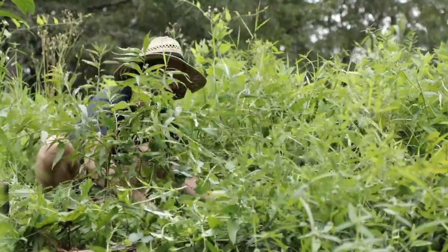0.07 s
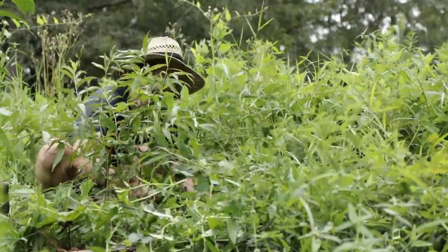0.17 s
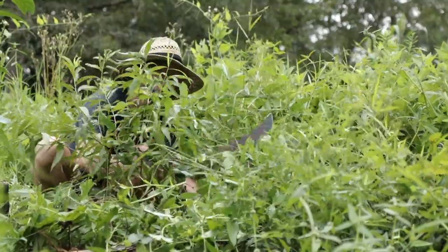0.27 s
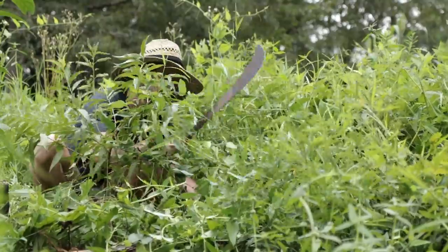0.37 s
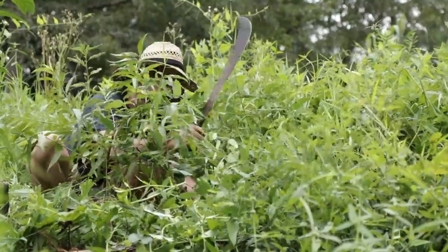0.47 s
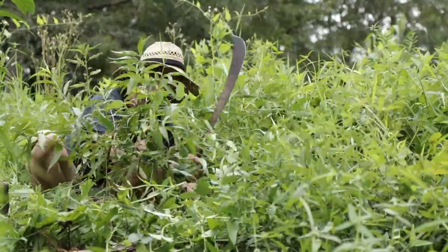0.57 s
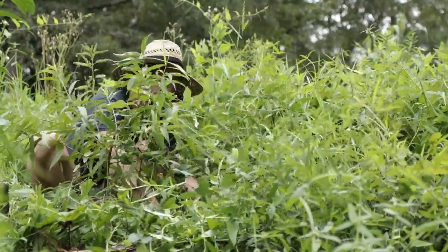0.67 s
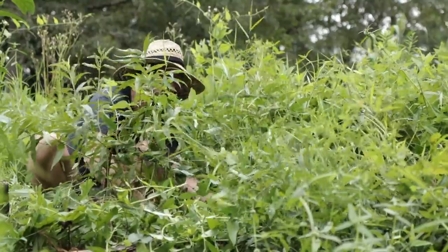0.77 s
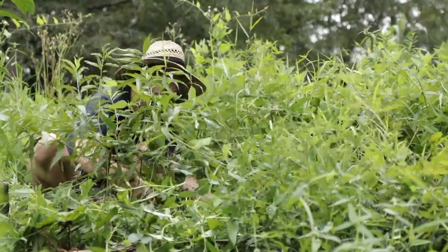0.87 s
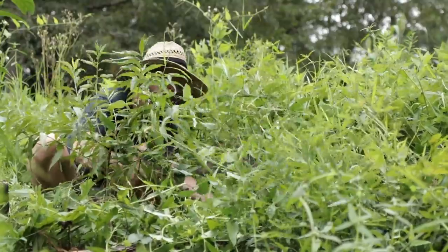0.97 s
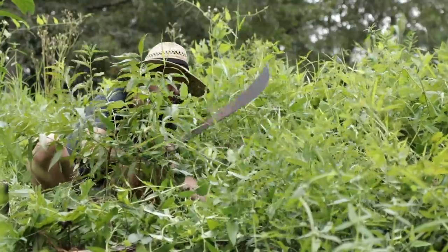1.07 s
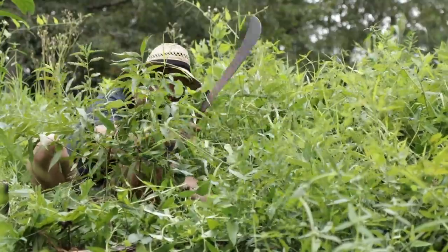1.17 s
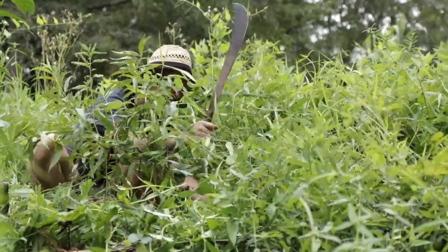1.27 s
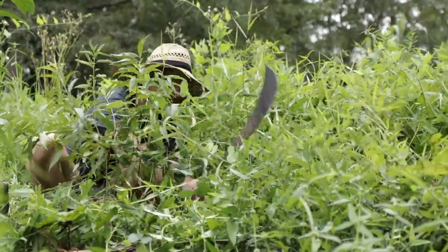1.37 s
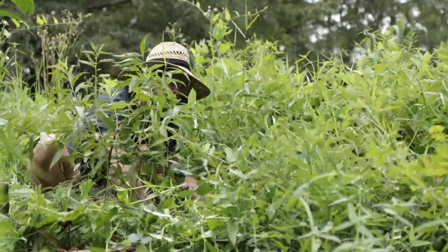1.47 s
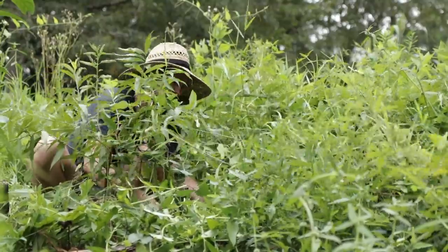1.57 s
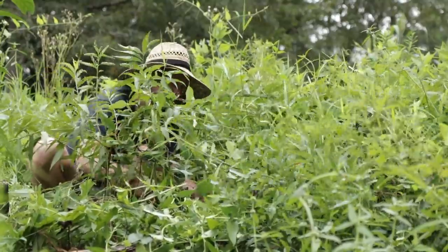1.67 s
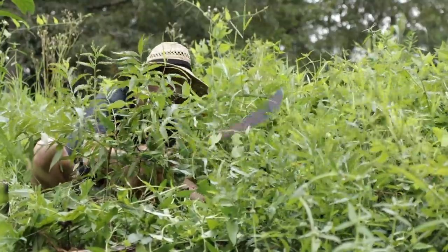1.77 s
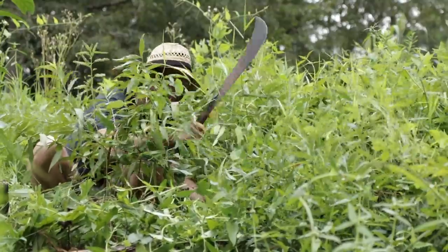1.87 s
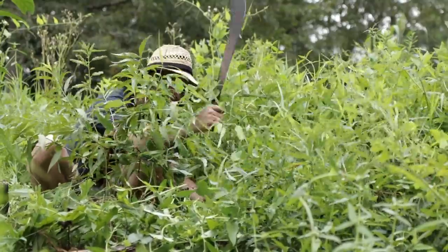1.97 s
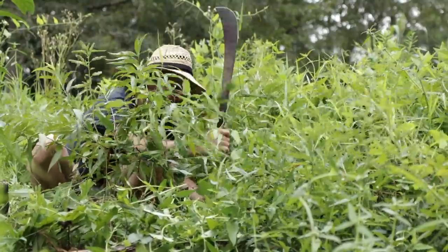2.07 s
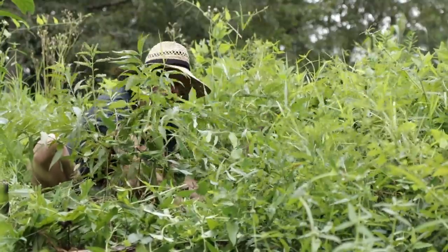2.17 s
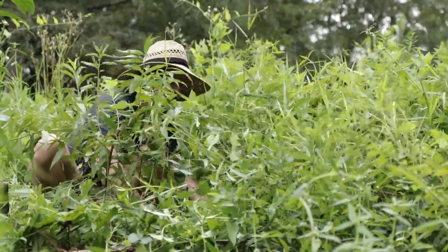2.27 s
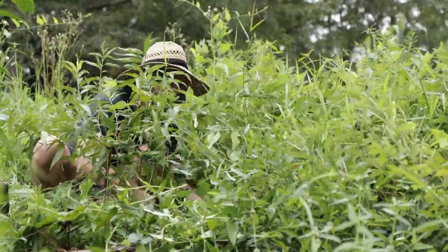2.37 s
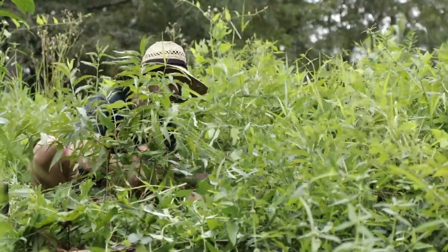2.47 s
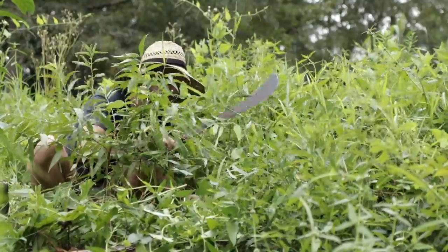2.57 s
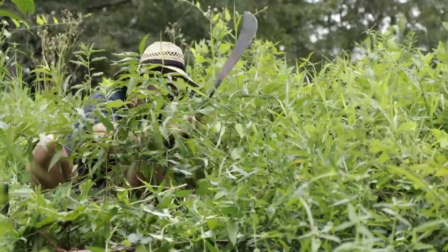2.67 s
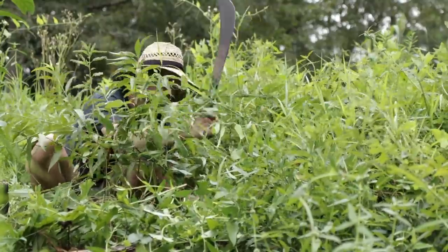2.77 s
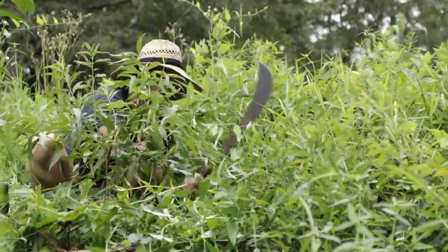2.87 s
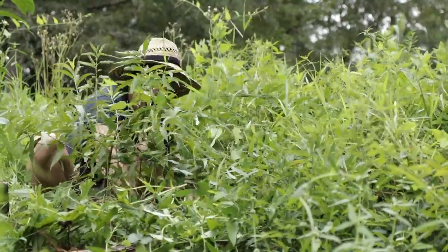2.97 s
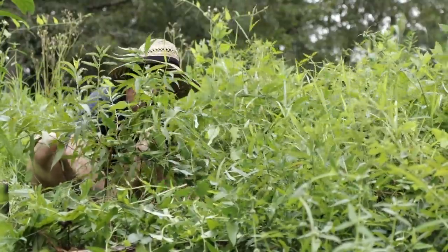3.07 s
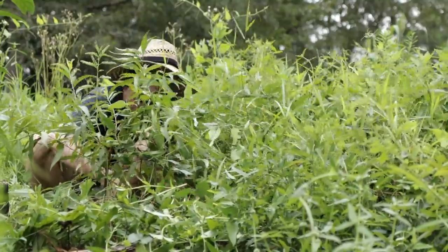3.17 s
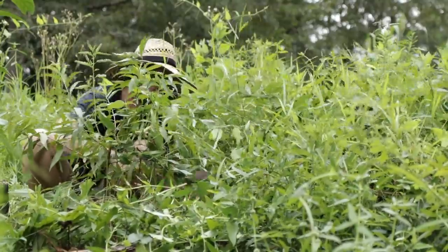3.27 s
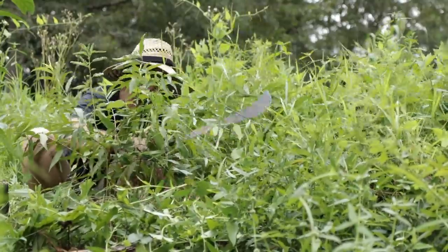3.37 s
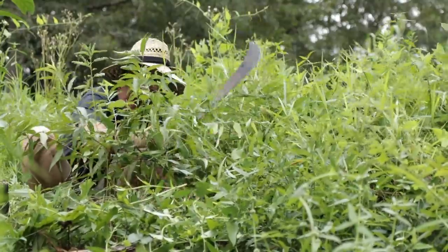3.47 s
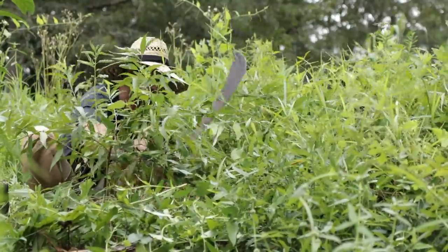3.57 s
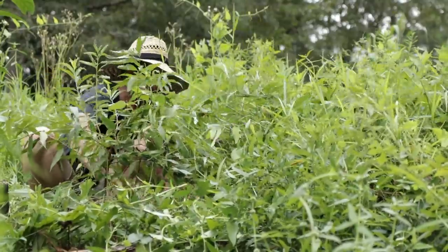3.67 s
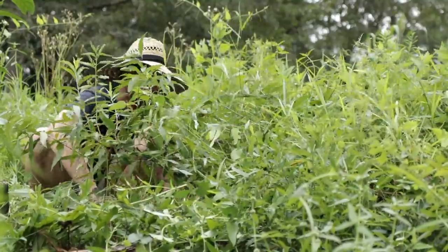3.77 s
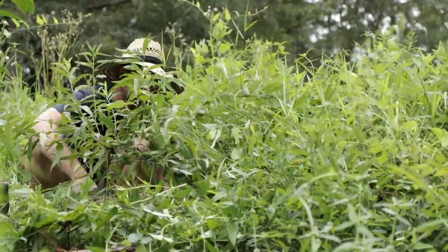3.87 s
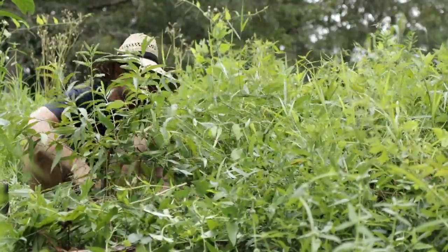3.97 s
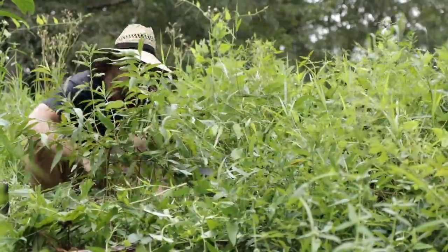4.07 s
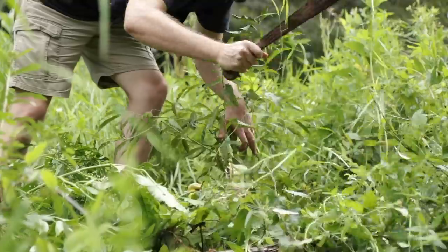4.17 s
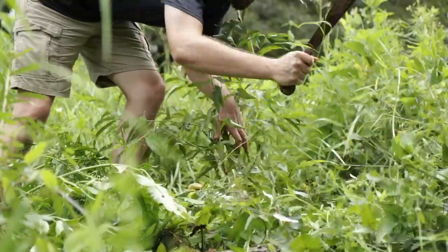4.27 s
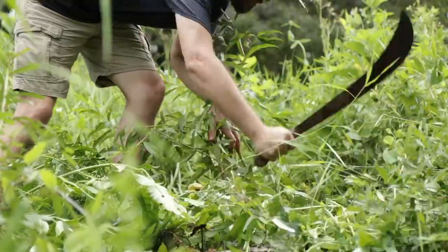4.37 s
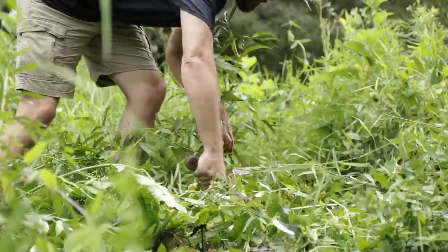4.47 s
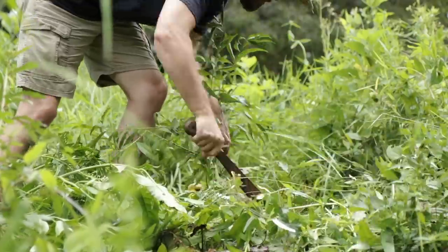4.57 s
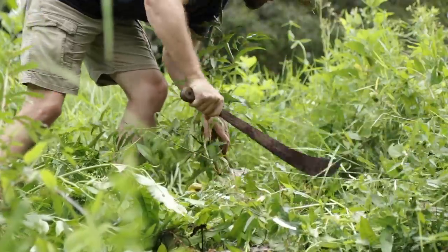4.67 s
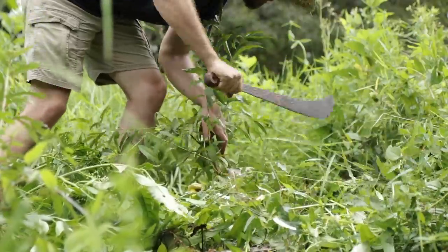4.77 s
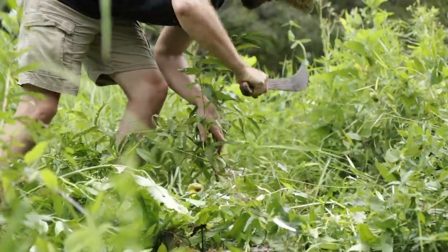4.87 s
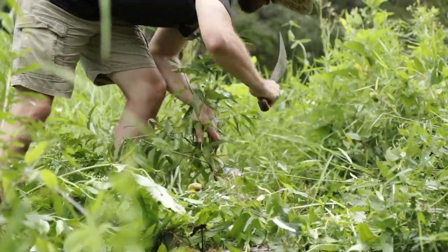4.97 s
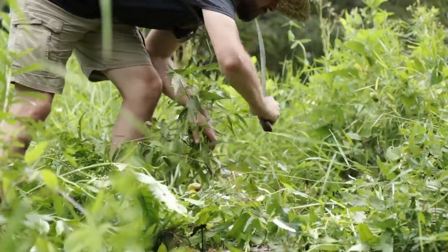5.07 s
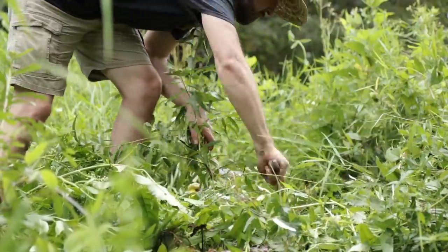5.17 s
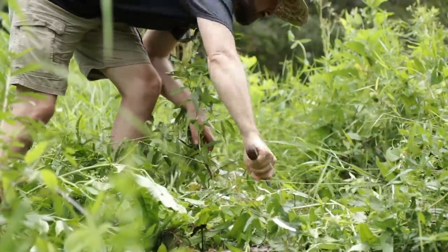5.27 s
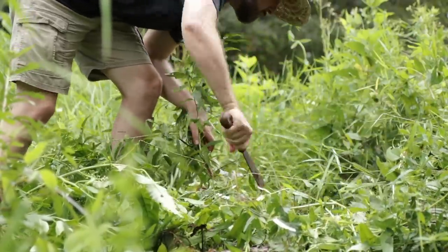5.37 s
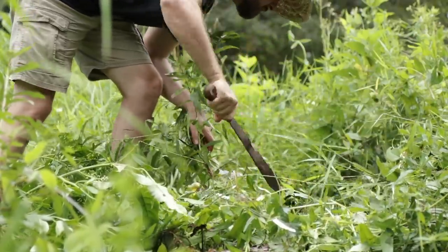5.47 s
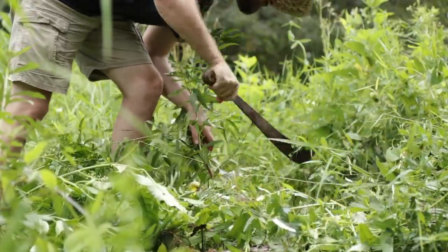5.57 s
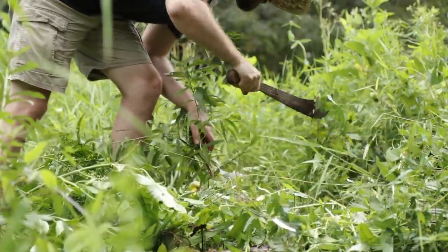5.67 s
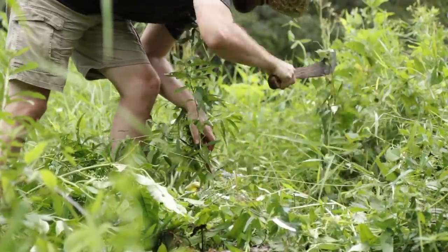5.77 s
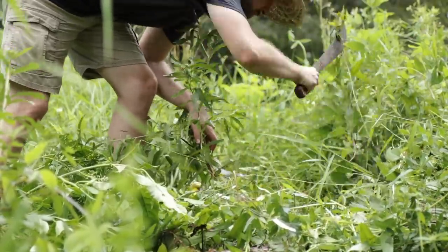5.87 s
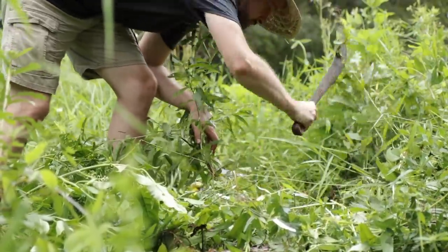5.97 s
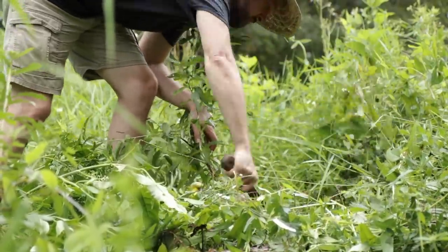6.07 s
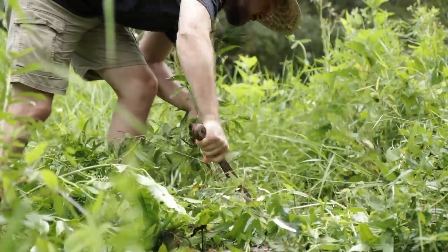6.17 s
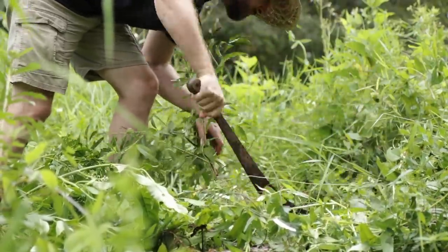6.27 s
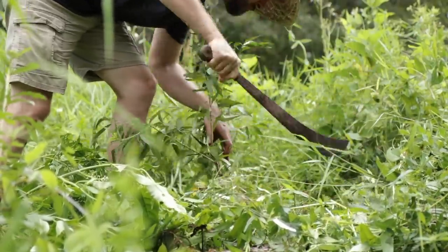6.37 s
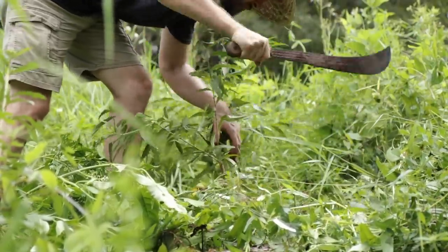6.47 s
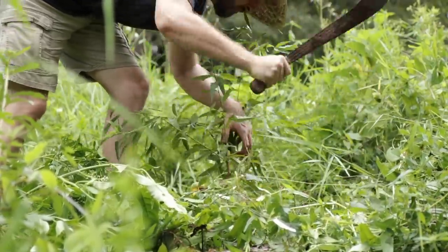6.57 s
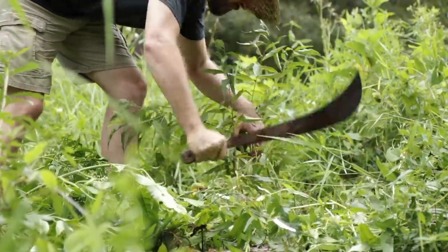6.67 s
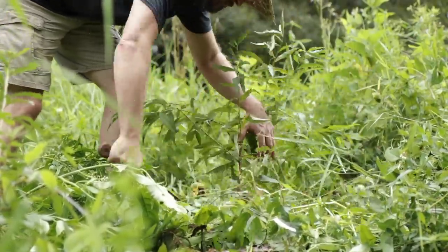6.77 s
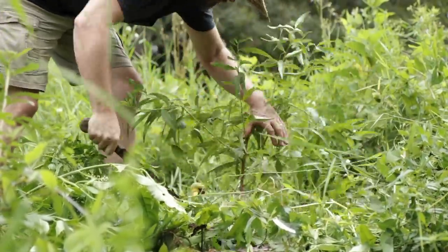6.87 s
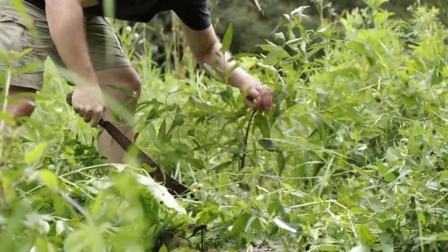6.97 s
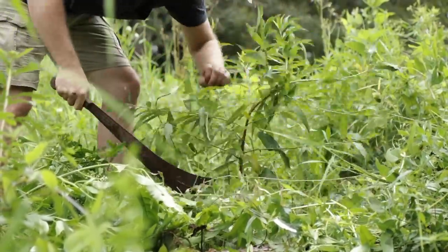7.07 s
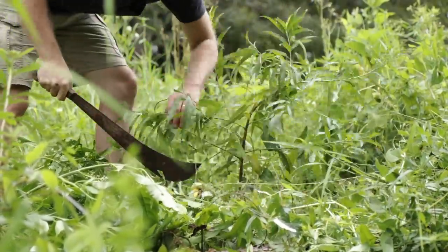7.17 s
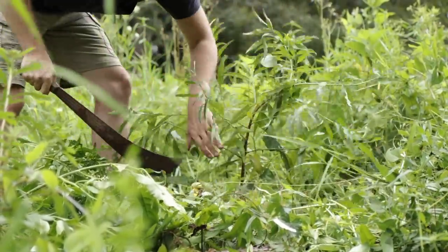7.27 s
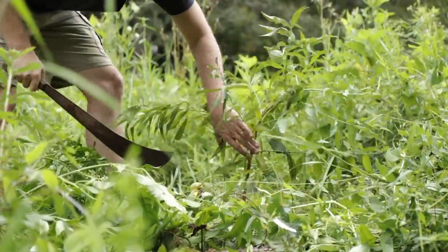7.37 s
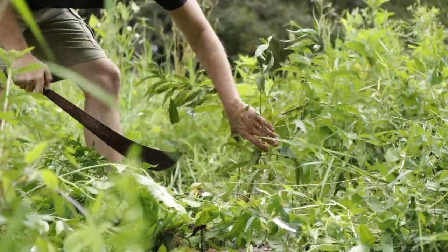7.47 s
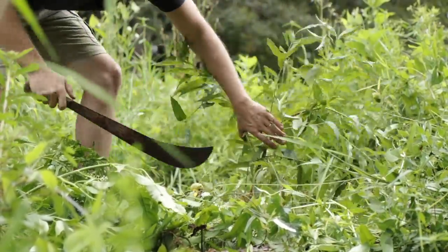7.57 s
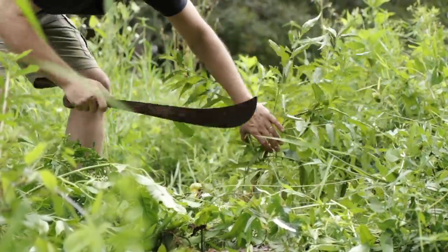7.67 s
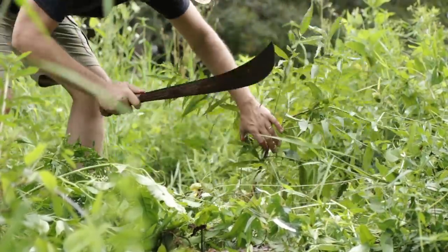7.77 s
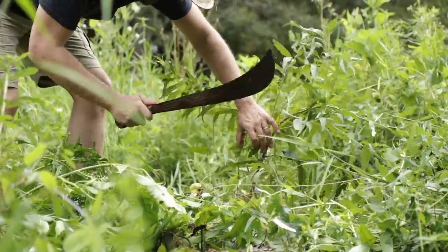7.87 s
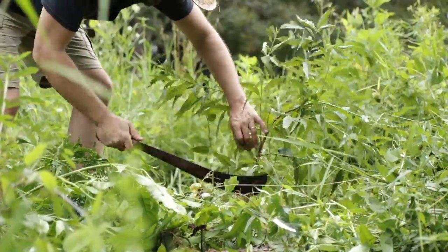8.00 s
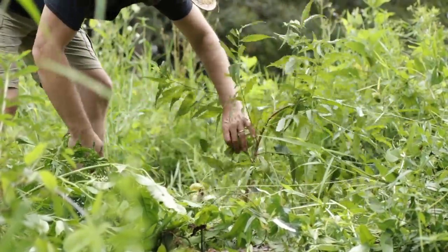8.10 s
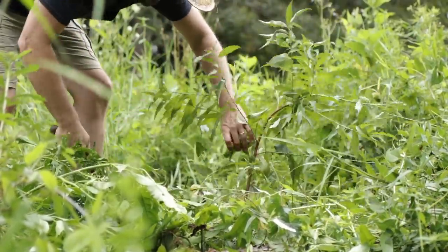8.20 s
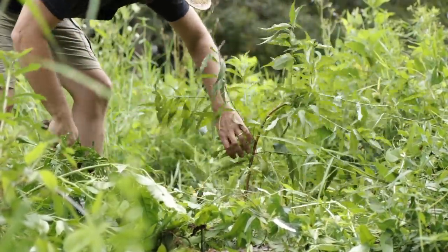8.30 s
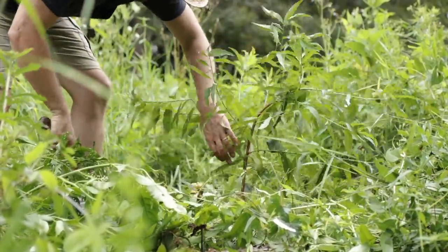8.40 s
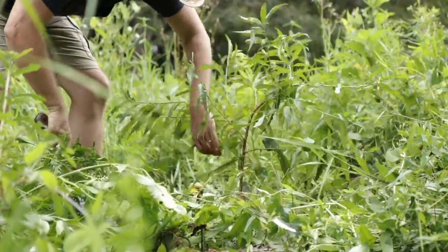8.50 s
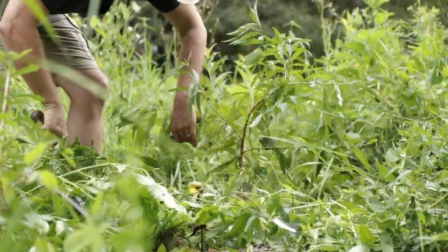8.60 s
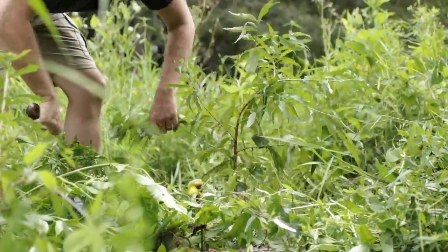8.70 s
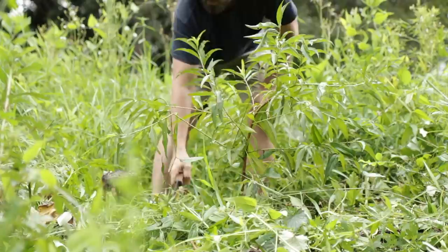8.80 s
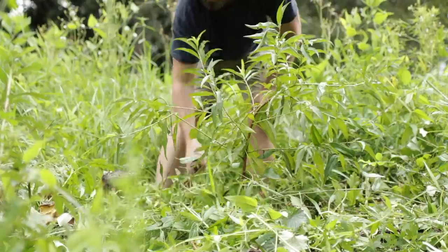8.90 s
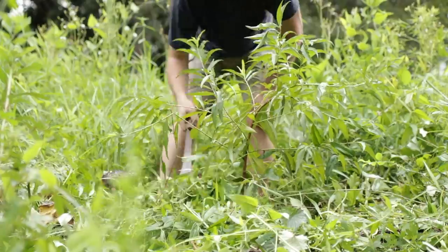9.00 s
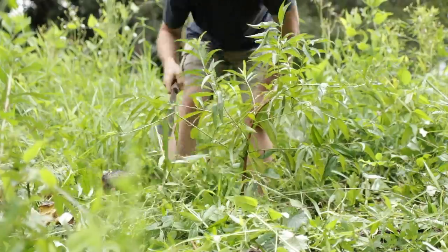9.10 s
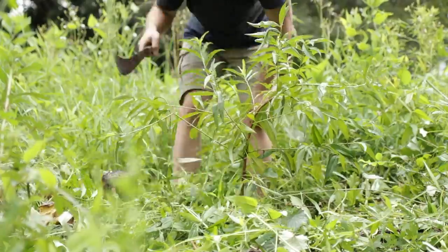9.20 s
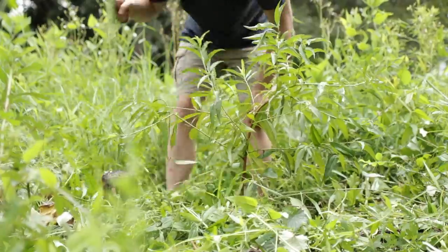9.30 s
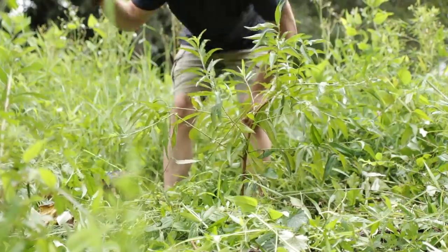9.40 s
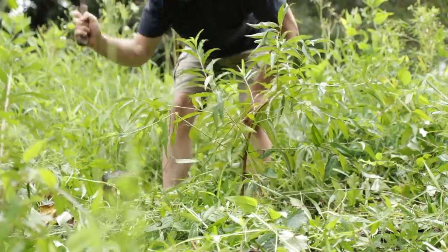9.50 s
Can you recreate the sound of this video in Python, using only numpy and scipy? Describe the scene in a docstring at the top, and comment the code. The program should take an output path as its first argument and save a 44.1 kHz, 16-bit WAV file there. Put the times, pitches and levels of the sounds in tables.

```python
"""Twelve machete strokes cut through tall weeds. Each tears a few stems by brittle fracture, excites the
blade's modes and ends as an impact in the soil. Now and then friction makes the steel sing as it is
drawn back across the stalks; twigs snap and leaves rustle between strokes. Crickets and katydids sing
by stridulation, over faint bird-like notes, open-air hush and the drone of a far machine."""
import sys
import numpy as np
from scipy import signal
from scipy.fft import rfft, irfft
from scipy.io import wavfile
from scipy.ndimage import uniform_filter1d

SR = 44100
rng = np.random.default_rng(int(sys.argv[2]) if len(sys.argv) > 2 else 0)


def inscribe(sig):
    """Save sig as 16-bit PCM at rate SR to the path in sys.argv[1].

    A 1-D sig is mono; a 2-D sig holds one channel per row.
    Samples are clipped to [-1, 1] before scaling.
    """
    pcm = np.round(np.clip(np.atleast_2d(sig).T, -1, 1) * 32767)
    wavfile.write(sys.argv[1], SR, pcm.astype(np.int16))


N = 420713
TIME = np.arange(N) / SR


# The edge passes in to the thickest stem of a bunch, then out; first_stems_db is relative to that stem.
# start_s, way_in_s, way_out_s, level_db, first_stems_db, tilt_db_per_octave, stem_hz, falling_leaves_db
MACHETE_STROKES = [(0.002, 0.013, 0.01, -14.5, -2.5, 0.8, 1480, -36),
                   (0.715, 0.024, 0.023, -12.5, -11, 0.2, 2170, -41),
                   (1.4993, 0.0026, 0.014, -10, -8, -0.5, 1920, -37.5),
                   (2.249, 0.013, 0.021, -11, -14, 0, 2350, -36.5),
                   (2.996, 0.0049, 0.023, -12.5, -9, 0.3, 2200, -36.5),
                   (3.735, 0.027, 0.0055, -17, -5, -0.3, 2250, -42),
                   (4.511, 0.0087, 0.0089, -14, -2, -0.8, 2200, -50),
                   (5.259, 0.023, 0.024, -15.5, -5, 1.6, 2300, -37.5),
                   (6.145, 0.011, 0.0027, -11.5, -26, 1, 6500, -41.5),
                   (6.7944, 0.015, 0.0079, -12, -2.5, 0.5, 2230, -40.5),
                   (8.142, 0.028, 0.012, -20, -11, -0.5, 1730, -37),
                   (8.892, 0.0072, 0.004, -8.5, -6.5, 0, 1500, -38.5)]
def cuts():
    """Fracture under load: force peaks at the thickest stem, which splits; the cut ends crunch."""
    out, t = np.zeros(N), np.arange(SR // 5) / SR
    exit_db = -6
    for start, way_in, way_out, db, first_db, tilt_db, stem_hz, _ in MACHETE_STROKES:
        length = way_in + way_out
        load = amp(np.interp(t, [0, way_in, length], [first_db, 0, exit_db]))
        edge = load * contact(t, length, rise=0.000067, fall=0.0076)
        split = amp(-3.5) * contact(np.maximum(t - way_in, 0), 0, rise=0.0001, fall=0.002)
        crunch = amp(-24.5) * contact(t, length, rise=0.015, fall=0.017)
        add(out, start, amp(db - 1.1) * tear(t, edge + split + crunch, tilt_db, stem_hz))
    return out


# Spectrum of tearing stems: frequency_hz, density_db
STEM_SPECTRUM = [(100, -10), (330, 1.5), (650, -2), (1100, -6.5), (1500, 0), (2100, 1), (2900, -1.5),
                 (5500, -2.5), (9000, -9.5), (15500, -15)]
def tear(t, force, tilt_db, stem_hz):
    """Impulse excitation: breaking fibres ring the stalk and the blade, which the stems damp."""
    clicks = fibres(len(t), per_s=10000, spread_db=2.9) * force
    fracture = colour(clicks, STEM_SPECTRUM, tilt_db)
    stalk = resonance(fracture, stem_hz, q=5)
    clank = steel(clicks, favoured_hz=stem_hz, damping_db_per_s=1500)
    sound = fracture + amp(-6) * stalk + amp(-11) * clank
    return amp(-1) * sound * np.linalg.norm(force) / np.linalg.norm(sound)


# The blade lands in the soil: start_s, level_db, knock_hz, decay_s, thump_db
SOIL_IMPACTS = [(0.0198, -3.5, 786, 0.007, -17.5), (.756, -8.5, 360, 0.0097, -20),
                (1.514, -12.5, 276, 0.013, -23), (2.2741, -5.5, 441, 0.0068, -23.5),
                (3.016, 0.5, 591, 0.0061, -30), (3.7603, -3.5, 566, 0.0056, -24.5),
                (4.523, -8.5, 394, 0.0084, -28), (5.282, -17, 620, 0.02, -30),
                (6.153, -15, 519, 0.012, -29), (6.808, -10.5, 774, 0.0076, -25.5),
                (8.167, -48, 400, 0.0091, -52), (8.8984, -11, 648, 0.007, -23)]
def blows():
    """Inelastic impact: a crack, a knock that falls in pitch as the blade slows, a thump of the ground."""
    out, t = np.zeros(N), np.arange(SR // 2) / SR
    for start, db, hz, decay, thump_db in SOIL_IMPACTS:
        knock_hz = hz * (0.359 + 0.72 * np.exp(-t / 0.01093) + 1.08 * np.exp(-t / 0.0013))
        knock = tone(knock_hz) * contact(t, 0, rise=0.00075, fall=decay)
        crack = noise(len(t), [(60, -20), (hz, -2), (hz * 3.1, 0), (hz * 8, -20)])
        crack *= contact(t, 0, rise=0.0001, fall=0.0015)
        crumbs = noise(len(t), [(60, -16), (hz * 0.5, -2), (hz, 0), (hz * 5, -26)])
        crumbs *= contact(t, 0, rise=0.00053, fall=decay)
        add(out, start, amp(db) * (amp(-3) * knock + amp(-3.5) * crack + amp(-4.5) * crumbs))
        thump = tone(66 + rng.uniform(95, 167) * np.exp(-t / 0.019))
        soil = noise(len(t), [(35, -56), (55, 13), (85, 8), (170, -4), (400, -21), (2000, -67)])
        ground = (thump + 0.45 * soil) * contact(t, 0, rise=0.002, fall=0.017)
        tail = amp(-17) * soil * contact(t, 0, rise=0.0074, fall=0.099)
        add(out, start, amp(thump_db + 3) * (ground + tail))
    return out


# The edge clips grit in the soil: start_s, length_s, level_db, ring_hz
GRIT_CONTACTS = [(1.527, 0.0063, -10.5, 9100), (4.525, 0.0043, -9, 7040), (6.141, 0.004, -17.5, 9000),
                 (6.156, 0.0047, -5.5, 6400)]
def grit():
    """Hard contact: the edge meets a grain of stone in a short, very bright scratch."""
    out, t = np.zeros(N), np.arange(SR // 10) / SR
    for start, length, db, ring_hz in GRIT_CONTACTS:
        force = contact(t, length, rise=0.00028, fall=0.0022)
        add(out, start, amp(db) * tear(t, force, tilt_db=9.5, stem_hz=ring_hz))
    return out


# Modes of the steel blade: frequency_hz, level_db, t60_s
BLADE_MODES = [(2222, 0, .14), (3058, -5, .55), (3888, -4, .2), (4681, -4, .18), (5455, -1, .3),
               (6709, -2, .22), (8020, -7, .14), (9450, -11, .12), (11500, -14, .1)]
def steel(force, favoured_hz, damping_db_per_s=0):
    """Modal vibration: the point of contact favours some modes, and added damping shortens the ring."""
    t = np.arange(SR // 2) / SR
    ring = np.zeros(len(t))
    for hz, db, t60 in BLADE_MODES:
        coupling_db = -10 * abs(np.log2(hz / favoured_hz))
        ring += amp(db + coupling_db - 60 * t / t60) * np.sin(2 * np.pi * hz * t)
    return convolve(force, ring * amp(-damping_db_per_s * t))


# The flat of the blade slides over stalks: start_s, length_s, level_db, favoured_hz
BLADE_SLIDES = [(.29, .05, -56, 5000), (1.028, .03, -40, 6200), (1.797, .006, -48, 3500),
                (3.018, .004, -32, 5500), (4.09, .07, -54, 3800), (4.61, .03, -41, 3500),
                (5.53, .04, -48, 3100), (6.06, .07, -52, 4600), (6.17, .1, -50, 3100),
                (6.9, .04, -46, 2200), (7.02, .03, -34, 3100), (7.03, .04, -39, 6500),
                (7.03, .1, -37, 2200)]
def slides():
    """Frictional excitation: a stalk catches the free blade, then rubs along it and keeps it singing."""
    out, t = np.zeros(N), np.arange(SR * 3 // 5) / SR
    for start, length, db, favoured_hz in BLADE_SLIDES:
        pressure = amp(db) * contact(t, length, rise=0.0028, fall=0.0018)
        rub = pressure * fibres(len(t), per_s=13000, spread_db=-2)
        catch = 0.7 * np.linalg.norm(rub) * (t == 0)
        add(out, start, steel(rub + catch, favoured_hz) + amp(-13) * colour(rub, LEAF_SPECTRUM))
    return out


# Spectrum of a breaking twig: frequency_hz, density_db
TWIG_SPECTRUM = [(150, -9), (500, -0.5), (1600, 0), (5000, -3), (9000, -6), (15000, -16.5)]
# Single twigs break: start_s, level_db, ring_hz
TWIG_SNAPS = [(1.03, -22.5, 5560), (1.746, -24, 1680), (1.797, -27.5, 5700), (2.641, -21.5, 926),
              (3.12, -23, 1410), (3.291, -27, 2180), (4.406, -33, 3580), (4.421, -28.5, 3660),
              (4.488, -13.5, 2770), (4.494, -11, 1480), (4.764, -28.5, 2840), (5.095, -32, 1640),
              (5.521, -27.5, 2460), (6.241, -24, 1440), (7.196, -26, 1550), (7.336, -27.5, 1450),
              (8.15, -15, 1910), (8.217, -29, 2040), (8.362, -24, 5540), (8.477, -28, 6140),
              (8.598, -28, 5240)]
def snaps():
    """Brittle fracture: a short crack rings each twig at its natural frequency."""
    out, t = np.zeros(N), np.arange(SR // 20) / SR
    for start, db, ring_hz in TWIG_SNAPS:
        burst = rng.standard_normal(len(t)) * contact(t, 0, rise=0.0001, fall=0.0036)
        crack = colour(burst, TWIG_SPECTRUM)
        snap = crack + amp(4) * resonance(crack, ring_hz, q=4)
        add(out, start, amp(db + 1) * snap / abs(snap).max())
    return out


# Spectrum of crisp leaves: frequency_hz, density_db
LEAF_SPECTRUM = [(500, -13.5), (1000, -18), (1800, -4), (3000, -5.5), (5500, -8), (9000, -12.5),
                 (15500, -17.5)]
# Spectrum of brushed stalks and ground litter: frequency_hz, density_db
BRUSH_SPECTRUM = [(100, -19.5), (350, -2.5), (700, -6), (1500, -7.5), (3200, -20)]
def foliage():
    """Shot noise: leaves crackle in clumps and tiny stalks tick, over a duller brushing."""
    leaf_gain, brush_gain = stirring()
    crackle = fibres(N, per_s=6000, spread_db=3.3) * amp(1.7 * drift(60))
    leaves = colour(crackle, LEAF_SPECTRUM) * amp(1.3 * drift(5))
    tick = contact(TIME[:SR // 100], 0, rise=0.0001, fall=0.0023)
    ticking = convolve(abs(fibres(N, per_s=45, spread_db=3)), tick)
    stalks = unit(colour(ticking * rng.standard_normal(N), TWIG_SPECTRUM))
    brush = colour(fibres(N, per_s=2000, spread_db=4), BRUSH_SPECTRUM) * amp(1.1 * drift(22))
    return (amp(-1) * leaves + amp(-7.5) * stalks) * leaf_gain + amp(2) * brush * brush_gain


# Hand, foot or blade pushes through the foliage: start_s, length_s, leaf_db, brush_db
FOLIAGE_PUSHES = [(0.23, 0.19, -46, -55), (0.978, 0.12, -43, -50), (1.135, 0.34, -51.5, -72),
                  (1.863, 0.16, -48.5, -71), (2.602, 0.17, -51, -56), (3.07, 0.47, -42.5, -51),
                  (3.95, 1, -48, -55), (4.774, 0.23, -43, -47.5), (5.48, 0.27, -48, -62),
                  (5.668, 0.26, -44, -53), (6.03, 0.15, -46, -53), (6.218, 0.16, -43, -55),
                  (6.956, 0.24, -35, -50), (7.28, 0.14, -49, -61), (7.537, 0.22, -41.5, -39),
                  (8.32, 0.52, -45.5, -52.5), (8.61, 0.41, -45, -52.5), (8.962, 0.43, -43.5, -46.5)]
def stirring():
    """Incoherent sources add in power: falling plants and pushes set the gains of leaves and brushing."""
    leaf_power = np.full(N, amp(-58) ** 2)  # the weeds are never quite still
    brush_power = np.full(N, amp(-65.5) ** 2)
    t = np.arange(SR) / SR
    for start, way_in, way_out, *_, fall_db in MACHETE_STROKES:
        severed = start + way_in + way_out
        add(leaf_power, severed, (amp(fall_db) * contact(t, 0, rise=0.004, fall=0.18)) ** 2)
        add(brush_power, severed, (amp(fall_db - 4.5) * contact(t, 0, rise=0.004, fall=0.14)) ** 2)
    for start, length, leaf_db, brush_db in FOLIAGE_PUSHES:
        swell = np.sin(np.pi * np.minimum(t / length, 1))
        add(leaf_power, start, (amp(leaf_db) * swell) ** 2)
        add(brush_power, start, (amp(brush_db) * swell) ** 2)
    return np.sqrt(leaf_power), np.sqrt(brush_power)


# One cricket a row: pitch_hz, wing_strokes_per_s, level_db
CRICKET_VOICES = [(7810, 49.5, 8.5), (8010, 82, 5), (7610, 82, 4), (7800, 63, -5.5), (8380, 67, -0.5),
                  (9860, 61, -2)]
def crickets():
    """Stridulation: every wing stroke is a short tone that slides down; the weeds scatter the song."""
    song = np.zeros(N)
    for hz, strokes_per_s, db in CRICKET_VOICES:
        stroke_phase = np.cumsum(strokes_per_s * (1 + 0.044 * drift(7.1))) / SR % 1
        pitch_hz = hz * (1 + 0.14 * (0.5 - stroke_phase) + 0.016 * drift(200))
        pulse = amp(2 * drift(30)) * np.sin(np.pi * stroke_phase) ** 2
        song += amp(db) * pulse * tone(pitch_hz)
    level_db = np.where(TIME < 4.2, -43.5, -46)  # the crickets are softer from 4.2 s on
    return amp(level_db) * unit(song + amp(-3.5) * field_echo(song))


# A near katydid buzzes: start_s, length_s, level_db, wing_hz
KATYDID_BUZZES = [(0.0, 0.89, -48, 14000), (1.872, 1.1, -49.5, 13500), (4.201, 4.65, -46.5, 14600),
                  (6.276, 2.2, -47.5, 13800), (8.95, 0.67, -52, 10000)]
# A katydid ticks between buzzes: start_s, end_s
KATYDID_TICK_RUNS = [(1.42, 1.85), (3.54, 4.0)]
def katydids():
    """Gated stridulation: near katydids buzz in bouts and tick, over an unbroken far chorus."""
    chorus = rasp()
    out = amp(-51) * chorus
    for start, length, db, wing_hz in KATYDID_BUZZES:
        add(out, start, amp(db) * rasp(wing_hz) * contact(TIME, length, rise=0.027, fall=0.12))
    ticks_per_s = 11
    tick = amp(-39) * contact(TIME[:SR // 20], 0.0052, rise=0.001, fall=0.003)
    for start, end in KATYDID_TICK_RUNS:
        for onset in np.arange(start, end, 1 / ticks_per_s):
            add(out, onset, tick * chorus[round(onset * SR):][:len(tick)])
    return out


# Spectrum of scraping katydid wings: frequency_hz, density_db
RASP_SPECTRUM = [(6000, -38), (8500, -15), (9700, -4.5), (11000, -15), (12400, -9), (13400, -1.5),
                 (14700, -5), (15800, -6)]
def rasp(wing_hz=None, beat_hz=47.4):
    """Amplitude modulation: a high scrape throbs with the wing beat; leaf reflections comb-filter it."""
    beat = np.cos(2 * np.pi * np.cumsum(beat_hz + 0.2 * drift(1)) / SR)
    scrape = noise(N, RASP_SPECTRUM)
    if wing_hz:
        scrape += amp(3.5) * resonance(scrape, wing_hz, q=11)
    direct = unit(scrape * (1 + 0.7 * beat))
    reflections = rng.standard_normal((4, SR // 100))
    combed = sum(amp(4 * drift(3)) * signal.oaconvolve(direct, taps)[:N] for taps in reflections)
    steady = combed / np.sqrt(uniform_filter1d(combed ** 2, size=SR // 4))
    return unit(steady + amp(-4) * direct)


# Faint, far bird-like notes: start_s, length_s, pitch_hz, level_db
BIRD_NOTES = [(6.665, .08, 1430, -52), (7.39, 0.061, 1454, -46), (8.056, .08, 1386, -51),
              (8.696, 0.082, 1350, -51.5)]
def bird():
    """Soft pure tones, blurred by scattering from the trees."""
    out = np.zeros(N)
    for start, length, hz, db in BIRD_NOTES:
        t = np.arange(round(length * SR)) / SR
        add(out, start, amp(db) * np.hanning(len(t)) * np.sin(2 * np.pi * hz * t))
    return out + amp(-6) * field_echo(out)


# Spectrum of the open air: frequency_hz, density_db
AIR_SPECTRUM = [(20, -39), (45, -8.5), (70, -0.5), (120, -1), (200, 1), (310, 0.5), (430, -9), (800, -13),
                (1350, -8), (1900, -16), (4000, -20), (7000, -16), (11000, -14), (15500, -18)]
def hush():
    """Broadband ambient noise whose level wanders slightly."""
    return amp(-46 + 1.24 * drift(3.2)) * noise(N, AIR_SPECTRUM)


# Partials of a far machine: frequency_hz, level_db
MACHINE_PARTIALS = [(117.5, -55.5), (174, -60), (236.2, -51.5), (295, -57)]
# Envelope of a deep hum that comes in at the end: time_s, level_db
HUM_ENVELOPE = [(8.9, -80), (9.0, -55), (9.54, -54)]
def machine():
    """Random modulation: each partial of the drone wavers in level and pitch, above a deeper hum."""
    drone = np.zeros(N)
    for hz, db in MACHINE_PARTIALS:
        waver = amp(2.05 * drift(4.9))
        drone += amp(db) * unit(waver * tone(hz + 1.625 * drift(4.46)))
    hum_db = np.interp(TIME, *np.transpose(HUM_ENVELOPE))
    return drone + amp(hum_db) * np.sin(2 * np.pi * 53.3 * TIME)


# Reverberation time among weeds and trees: frequency_hz, t60_s
FIELD_DECAY = [(80, 0.96), (300, 0.38), (1000, 0.22), (2500, 0.3), (6000, 0.45), (15000, 0.25)]
def field_echo(x):
    """Diffuse scattering: the echo builds up, then each band decays at its own rate."""
    hz, t, bands = signal.stft(rng.standard_normal(SR), SR, nperseg=256)
    decay = amp(-60 * t / read(FIELD_DECAY, hz)[:, None])
    build_up = 1 - np.exp(-t / 0.01)
    tail = signal.istft(bands * decay * build_up, SR, nperseg=256)[1]
    return convolve(x, tail)


def fibres(n, per_s, spread_db):
    """Poisson process: clicks of uneven size, as plant fibres break or rub."""
    size = amp(spread_db * np.minimum(rng.exponential(1, n), 4))
    return unit(size * rng.choice([-1, 1], n) * (rng.random(n) < per_s / SR))


def contact(t, length, rise, fall):
    """Exponential envelope: builds up, holds until length, then lets go (times in seconds)."""
    return (1 - np.exp(-t / rise)) * np.exp(-np.maximum(t - length, 0) / fall)


def drift(rate_hz):
    """Low-pass noise: a random wander with an rms of one."""
    n = N // 64 + 2
    hz = np.fft.rfftfreq(n, 64 / SR)
    slow = unit(irfft(rfft(rng.standard_normal(n)) / (1 + (hz / rate_hz) ** 4)))
    return np.interp(TIME, np.linspace(0, TIME[-1], len(slow)), slow)


def colour(x, spectrum, tilt_db=0):
    """Minimum-phase filter with the given spectral shape, tilted per octave above 1 kHz."""
    hz = abs(np.fft.fftfreq(4096, 1 / SR))
    octaves = np.log2(np.maximum(hz / 1000, 1))
    log_gain = np.log(amp(read(spectrum, hz) + tilt_db * octaves))
    taps = np.fft.ifft(np.exp(np.conj(signal.hilbert(log_gain)))).real
    return convolve(x, taps[:len(hz) // 2])


def noise(n, spectrum):
    """Gaussian noise shaped by (frequency_hz, density_db) points."""
    return colour(rng.standard_normal(n), spectrum)


def tone(hz):
    """Sine whose phase is the integral of its frequency."""
    return np.sin(2 * np.pi * np.cumsum(hz) / SR)


def resonance(x, hz, q):
    """Response of a single damped mode."""
    return signal.lfilter(*signal.iirpeak(hz, q, fs=SR), x)


def convolve(x, response):
    """Convolution with an impulse response scaled to unit energy."""
    return signal.oaconvolve(x, response / np.linalg.norm(response))[:len(x)]


def read(points, hz):
    """Interpolation on a log-frequency axis."""
    frequencies, values = np.transpose(points)
    return np.interp(np.log(hz + 1), np.log(frequencies), values)


def amp(db):
    """Decibels to gain."""
    return 10 ** (np.asarray(db) / 20)


def unit(x):
    """Normalisation to an rms of one."""
    return x / np.sqrt(np.mean(x ** 2) + 1e-20)


def add(mix, start_s, sound):
    """Superposes a sound on the mix."""
    part = mix[max(round(start_s * SR), 0):][:len(sound)]
    part += sound[:len(part)]


def scene():
    """Superposition in mono: the work close by, the insects around it, the distance behind."""
    cutting, ground = cuts() + grit(), blows()
    echo = field_echo(amp(-17) * cutting + amp(-32.5) * ground)
    work = cutting + ground + echo + slides() + snaps() + foliage()
    return (work + crickets() + katydids() + bird() + hush() + machine())[None]


def record(dry):
    """Band limiting: the microphone sheds the lowest bass, peaks clip at full scale, the top is cut."""
    thinned = signal.sosfilt(signal.butter(2, 45, "high", fs=SR, output="sos"), dry)
    lowpass = signal.firwin(601, cutoff=15800, window=("kaiser", 7), fs=SR)
    return signal.oaconvolve(np.clip(thinned, -1, 1), lowpass[None], "same")


dry = scene()
out = record(dry)
inscribe(out)
```